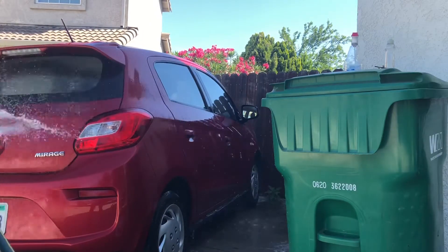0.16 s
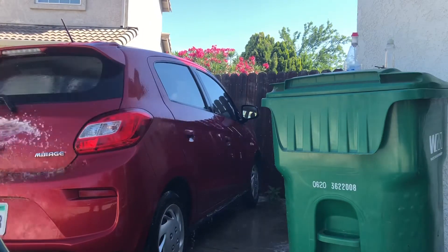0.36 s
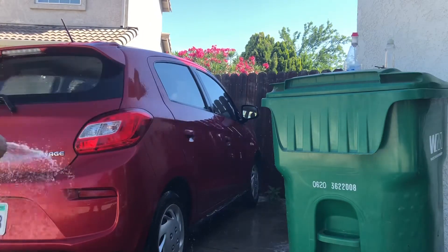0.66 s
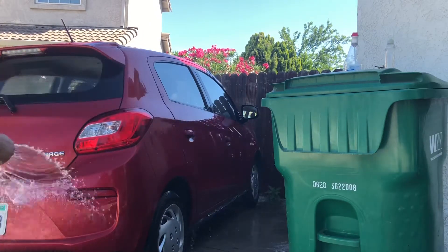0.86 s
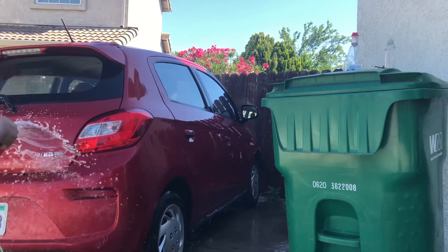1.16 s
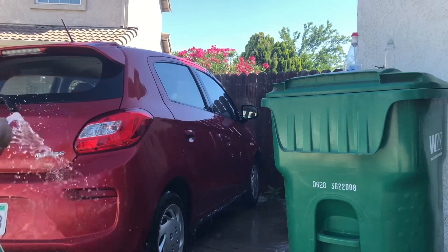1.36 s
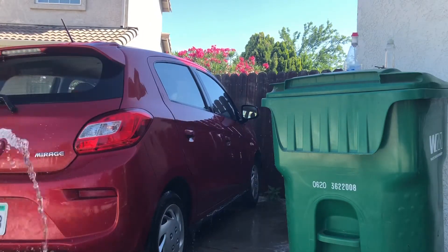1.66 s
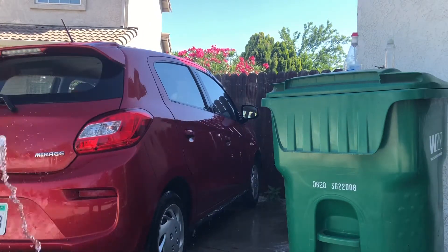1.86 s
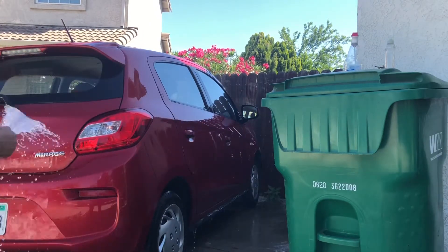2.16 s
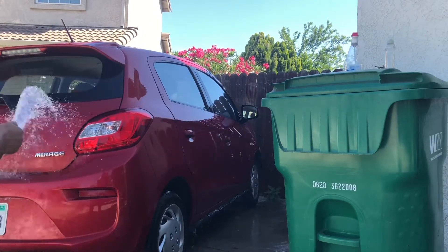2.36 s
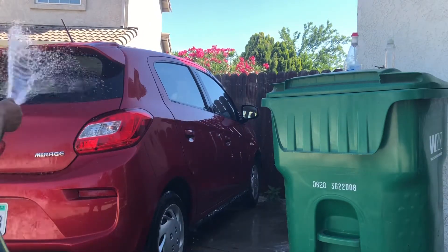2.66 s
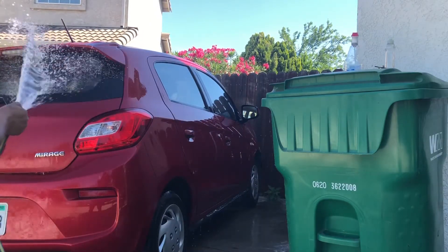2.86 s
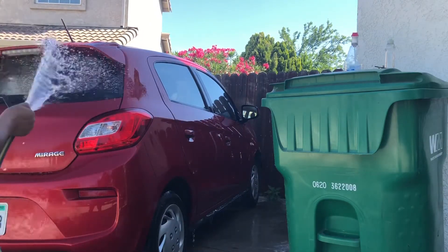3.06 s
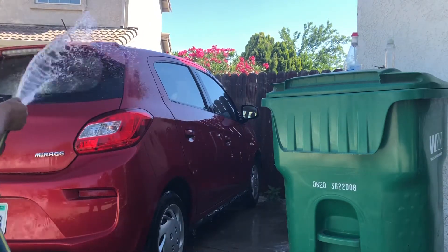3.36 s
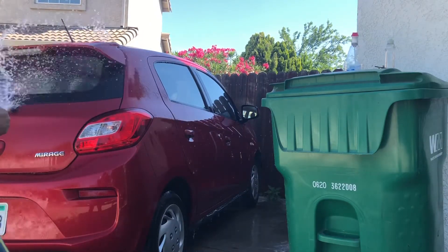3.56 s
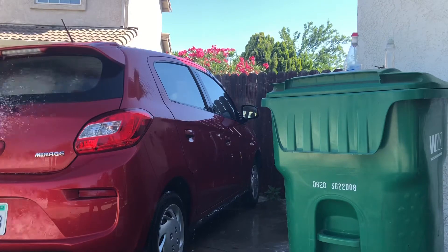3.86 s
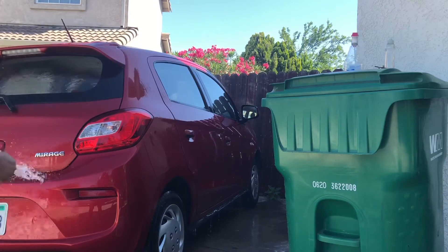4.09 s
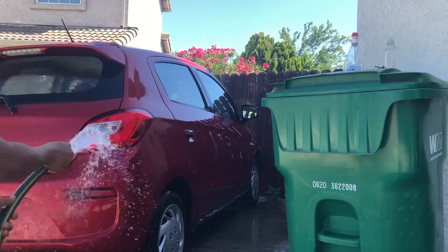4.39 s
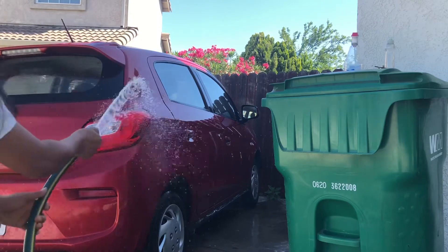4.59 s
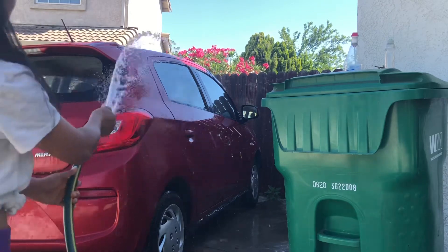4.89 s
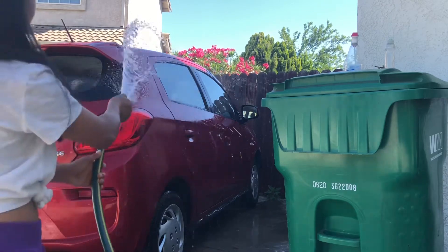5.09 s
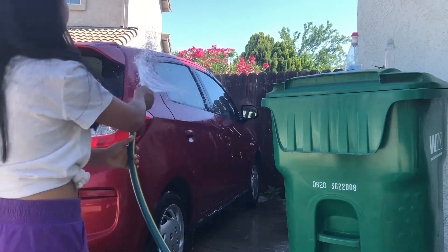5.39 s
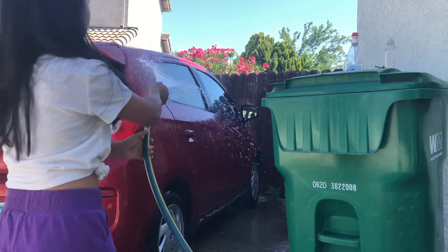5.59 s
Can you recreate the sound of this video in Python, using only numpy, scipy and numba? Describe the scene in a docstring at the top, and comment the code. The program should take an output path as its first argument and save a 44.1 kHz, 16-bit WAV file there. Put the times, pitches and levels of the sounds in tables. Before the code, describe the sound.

A hose with a half-blocked end sprays the back of a parked car, a metre or two from a mono outdoor microphone. From 0 to 1.6 s the jet drums steadily on hollow panels and patters on sheet metal and glass, with bright hiss and sharp wet smacks. From about 1.65 to 2.2 s the drumming drops away, leaving airy spray and splashing gobs. At 2.2 to 2.7 s a strong burst hits with low thumps and dense hiss, then it thins and softens towards 3.6 s. Short raspy, sliding sparrow chirps sound around 3.4, 3.6, 3.8 and 4 s. Between 4.1 and 4.5 s the jet strikes hard again, booming and rattling over several panel tones with coarse splatter. It weakens to scattered droplets by 5.2 s, with faint chirps near 5.2 and 5.4 s and a small coarse splash around 5.5 s. Low distant traffic continues throughout.

```python
"""Hose spray on a parked car

A hose, half closed by a thumb, sprays the back of a car in a driveway, a metre or two from the microphone.
The jet drums on hollow panels (noise through low resonances) and rings sheet and glass (drops through
higher ones); spray hisses as thousands of tiny resonant droplets over smooth mist, and heavy gobs smack
with a broad crack and a plop. Behind, traffic rumbles as coloured noise and a sparrow's sliding tones chirp."""
import sys
import numpy as np
from scipy import signal
from scipy.fft import rfft, irfft
from scipy.io import wavfile
from scipy.ndimage import uniform_filter1d
from numba import njit

SR = 44100
rng = np.random.default_rng(int(sys.argv[2]) if len(sys.argv) > 2 else 0)


def transcribe(u):
    """Save the signal u as a 16-bit wav file named by the first command-line argument.

    u: samples, shape (n,) or (channels, n), limited to [-1, 1]; the rate is SR.
    q: integer samples, one column per channel.
    """
    v = np.clip(np.atleast_2d(u).T, -1, 1)
    q = np.round(v * 32767).astype(np.int16)
    wavfile.write(sys.argv[1], SR, q)


def gain_from_db(level_db):
    """Turn a decibel level (scalar or array-like) into a linear amplitude factor."""
    decades = np.asarray(level_db, float) / 20
    return 10 ** decades


N = 252825
TIME = np.arange(N) / SR  # seconds

# spectrum of distant traffic and air: pitch_hz, relative density_db (per Hz)
TOWN_SPECTRUM = [(18, -37), (30, -6), (59, 5), (92, 8.5), (437, -13), (721, -18), (1140, -17.5),
                 (1930, -22.5), (2720, -18.5), (3000, -28), (3900, -20), (6600, -120)]
TOWN_DB = -51.5

# notes of the sparrow's phrase: start_s (into the phrase), length_s, start_hz, end_hz, level_db,
# octave_db (overtone against the note)
SPARROW_NOTES = [(0., 0.029, 4900, 5280, -51, -30), (0.022, 0.034, 3630, 4430, -51, -32),
                 (0.045, .022, 3400, 3150, -57, -8), (.062, 0.08, 2990, 2430, -63.5, 6)]
# phrases sung: start_s, gain_db (added to the notes), notes_sung (count)
SPARROW_PHRASES = [(3.379, 0.5, 4), (3.615, 1, 4), (3.952, 0, 4), (5.39, -2.5, 2)]
# single sparrow notes: start_s, length_s, start_hz, end_hz, level_db
SPARROW_CHIRPS = [(3.818, 0.015, 3110, 2960, -44), (5.232, .12, 4300, 2960, -63)]
RASP_TOP_HZ, CLEAR_TONE = 250, 1.5  # roughness band top; steady tone against rasp of rms 1
PITCH_WOBBLE = .006  # fraction of the pitch
SECOND_VOICE_RATIO, SECOND_VOICE_DB = 1.09, -11
HOUSES_T60_S, HOUSES_DB = .25, -3.5

# heavy drops pattering on the sheet: start_s, level_db, upper_db (upper resonances, added to their levels)
PATTER = [(0.0, -46.5, -4), (0.3, -42.5, -9), (0.38, -52.5, 5), (0.56, -49, 4.5), (0.78, -41, 0),
          (0.96, -44.5, 3), (1.21, -43, -1), (1.45, -47.5, 1), (1.48, -37, -13), (1.5, -53, 3),
          (1.55, -44, -5), (1.64, -74, -2), (1.74, -70, 16), (2.03, -75, 3), (2.06, -69, 16),
          (2.09, -87, 4), (2.2, -83, -6), (2.22, -49, 12), (2.23, -46, -9), (2.26, -48.5, 5),
          (2.36, -35, -11), (2.38, -43, -4), (2.46, -39, -11), (2.55, -47, -13), (2.65, -47.5, 1),
          (2.7, -52, -13), (2.89, -57, -6), (2.98, -51, -8), (3.09, -50.5, 0), (3.5, -57.5, -7),
          (3.73, -54, -14), (3.77, -44.5, -4), (3.93, -52, -5), (4.31, -40, 0.5), (4.34, -42.5, 5.5),
          (4.45, -39, -4), (4.47, -47, 9), (4.5, -43, -6), (4.53, -53, -4), (4.64, -57, 10.5),
          (4.79, -60.5, 1.5), (4.88, -63.5, 8), (4.93, -48, 0), (5.04, -63, 2), (5.38, -58.5, -3),
          (5.44, -48, 1), (5.59, -54.5, 6.5), (5.73, -49, -2)]
# crowded ringing of sheet and glass: pitch_hz, width_hz, level_db (relative)
SHEET_MODES = [(629, 120, -2.5), (743, 146, 1), (830, 104, -3), (958, 150, -2), (1125, 160, -2),
               (1300, 310, -2.5), (1620, 560, -1), (1950, 680, -9.5)]
SHEET_SPLIT_HZ, SHEET_WANDER_DB = 1100, 2.6
PATTER_SPREAD_DB, PATTER_WASH_DB = 6, 3.5  # spread of drop sizes; running water against the drops

# jet on the bodywork: start_s, level_db, place (-1 rounded corner, 0 deep middle, 1 stiff edge)
JET = [(0.0, -41, 0.76), (.14, -42.5, 0.75), (.29, -36, 0.53), (.4, -39.5, 0.5), (.77, -35, 0.31),
       (1.0, -37.5, 0.53), (1.48, -37, 0.28), (1.55, -40.5, 0.37), (1.65, -62, 0.58), (2.205, -71, 0.79),
       (2.225, -40, 0.47), (2.36, -37, 0.82), (2.47, -43.5, 0.99), (2.51, -44, 0.78), (2.64, -42, 0.74),
       (2.78, -56, 0.72), (3.11, -45.5, 0.93), (3.48, -59, 0.77), (3.67, -50, 0.75), (3.77, -48.5, 0.83),
       (4.085, -45.5, 0.68), (4.11, -39, -0.036), (4.17, -32.5, 0.54), (4.21, -32, -0.74), (4.25, -36.5, 1),
       (4.275, -35, 0), (4.29, -33, -0.74), (4.325, -36.5, -0.44), (4.345, -42, 0.15), (4.385, -35, 0.34),
       (4.425, -36.5, 0.94), (4.465, -32, 0.37), (4.5, -40.5, 0.22), (4.58, -52, 0.66), (4.67, -46, 0.54),
       (4.82, -58, 0.21), (4.94, -52, 0.88), (5.04, -53.5, 0.3), (5.31, -64.5, 0.99), (5.37, -49, 0.26),
       (5.45, -46, 0.59), (5.73, -45.5, 0.88)]
# hollow panel modes: pitch_hz, width_hz, corner_db, middle_db, edge_db (relative levels)
PANEL_MODES = [(134, 28, -21, -17.5, -8), (159.6, 26.7, -18, 1.5, -7), (189, 38.6, -12, -3, -8),
               (244, 30.6, -16, -7.5, -7), (295.3, 37.4, 6, -6, -3.5), (366.3, 28, -16, -20.5, 1.5),
               (425, 54, 4, -27, 4), (508.6, 28, -8, -21, -5)]
# slugs of water that thump the panel: start_s, level_db (single-sample push against the steady push)
THUMPS = [(2.256, 30), (2.336, 30), (2.38, 33), (2.404, 32), (2.454, 33), (4.107, 30.5), (4.15, 27),
          (4.173, 27.5), (4.291, 30), (4.311, 35), (4.345, 36.5), (4.37, 28)]
PUSH_FLUTTER_DB, MODE_WANDER_DB = 1.3, .6

# big gobs of water landing: start_s, crack_db, pitch_hz (of the plop), sharpness (0-1),
# plop_db (against the crack)
GOBS = [(0.111, -12.5, 6200, 0.5, -29), (.1365, -26, 3840, 0.3, -4.5), (.215, -23, 5700, 0.85, -7),
        (0.2375, -16, 6400, 0.3, -11), (.367, -20, 5500, 0.3, -8.5), (0.411, -43, 3720, 0.4, -9),
        (.487, -28, 5470, 0.3, 0), (.538, -31, 3100, 0.6, 1), (.5413, -7.5, 9100, 0.6, -19),
        (.562, -20.5, 5300, 0.3, -12), (0.587, -37.5, 1160, 0.1, 8.5), (.6105, -15, 11600, 0.8, -6),
        (.627, -25, 6100, .6, -6), (.711, -30, 3290, 0.6, -8), (.7283, -15, 8350, 0.5, -15),
        (.865, -26, 5700, 0.5, 2), (.8936, -21, 9450, 0.6, -0.5), (0.931, -29, 6000, 0.7, 1),
        (0.943, -27, 2970, 0.3, -2), (0.9793, -20.5, 3730, 0.33, -11), (1.2058, -21, 13100, 0.6, -1),
        (1.2471, -29.5, 5400, 0.5, 4), (1.4712, -23.5, 4300, 0.6, -10), (1.478, -29.5, 2920, 0.3, 1),
        (1.5255, -29, 2850, 0.4, -2.5), (1.5329, -19, 12940, .7, -2), (1.5858, -25.5, 6340, .6, 1),
        (1.696, -28, 3750, 0.86, -9), (1.749, -18, 4940, 0.9, -9), (1.8412, -22, 7300, 0.8, -17),
        (1.917, -28.5, 6500, 0.6, 2.5), (1.957, -22, 9500, 0.7, -12), (1.959, -25, 2290, 0.3, -15),
        (2.0378, -4, 8300, 0.65, -18), (2.0558, -31.5, 1550, 0.15, 3.5), (2.0565, -17.5, 2750, 0.26, -3),
        (2.059, -16, 10000, .85, -12), (2.075, -40, 1500, .2, 4), (2.1277, -11.5, 5700, 0.6, -12),
        (2.1809, -23.5, 2700, 0.13, -5), (2.191, -36, 3230, 0.6, 5.5), (2.21, -28, 7160, 0.3, 3),
        (2.214, -21, 9500, .6, -9), (2.215, -32, 1650, 0.12, 7), (2.2383, -30, 2330, 0.5, 6),
        (2.2597, -27, 6000, .7, -2), (2.29, -22, 5970, 0.4, -2), (2.31, -20, 4850, 0.3, -4),
        (2.325, -33, 958, 0.4, -8), (2.3436, -10, 10900, 0.9, -9), (2.384, -22.5, 5530, 0.7, -1.5),
        (2.448, -27, 4930, 0.7, 1.5), (2.4699, -17, 5030, 0.74, -9), (2.4702, -21.5, 2770, 0.17, -0.5),
        (2.4885, -19, 8850, 0.4, -8), (2.588, -20.5, 4100, 0.07, -13), (2.638, -40, 865, 0.56, 2),
        (2.6336, -27.5, 2900, 0.05, -4), (2.6984, -30, 8400, 0.6, 1), (2.7687, -22.5, 7550, 0.45, -18),
        (2.964, -28.5, 5860, 0.3, 3), (3.0662, -27.5, 6540, 0.5, -1), (3.0809, -30.5, 4900, 0.7, 5.5),
        (3.228, -20, 7500, 0.4, -6), (3.345, -39, 2780, 0.44, 2.5), (3.441, -34.5, 5050, 0.5, 4),
        (3.5918, -16, 8700, 0.3, -11), (3.682, -21.5, 5530, 0.5, -17), (3.737, -19.5, 3600, 0.3, -15),
        (3.7538, -26, 2780, 0.47, -0.5), (3.765, -16.5, 5200, 0.85, -17), (3.8169, -21, 5640, 0.5, -2),
        (3.8396, -22, 6570, 0.5, -13), (3.8822, -36, 3460, 0.5, 8), (3.941, -21, 9000, .7, -10),
        (4.07, -36, 5030, .6, -1.5), (4.163, -20.5, 9600, 0.7, -4.5), (4.2138, -24, 6000, .8, -3.5),
        (4.2438, -20, 6240, .8, -5.5), (4.2843, -32.5, 970, 0.7, -5), (4.2848, -16, 6500, 0.4, -20),
        (4.335, -33, 1950, 0.4, 4), (4.3348, -34, 1130, 0.7, 4), (4.392, -18, 6400, 0.5, -5),
        (4.46, -37, 1030, 0.46, 0), (4.4672, -20, 12800, .7, 1), (4.5087, -21, 13400, 0.8, 2),
        (4.6655, -21.5, 4470, 0.05, -2), (4.671, -19, 6740, 0.56, 2), (4.843, -27, 5360, 0.1, -7),
        (4.9252, -17.5, 7260, 0.25, -7), (5.076, -41, 3280, 0.1, -2), (5.227, -40, 6260, 0.5, -7),
        (5.36, -33, 4250, 0.5, -3), (5.387, -30.5, 5000, 0.4, 0.5), (5.5135, -31, 2550, 0.3, 1),
        (5.587, -29, 5130, 0.5, -4), (5.675, -32.5, 4000, 0.3, 3.5), (5.706, -34, 5100, 0.8, -1),
        (0.0044, -27, 5940, 0.65, -6), (0.1531, -26, 6860, 0.65, -5), (0.1825, -25, 7520, 0.65, -5),
        (0.2514, -23, 13900, 0.65, -5), (0.385, -31, 9690, 0.65, -5), (0.4179, -26, 6550, 0.65, -7.5),
        (0.4379, -25.5, 5800, 0.6, -6), (0.4574, -28, 7460, 0.65, -5), (0.6449, -25, 14900, 0.65, -5),
        (0.9134, -17, 15300, 0.8, -1), (1.0104, -26, 15400, 0.65, 1), (1.0414, -29, 4470, 0.65, -3),
        (1.077, -30, 4840, 0.4, -9), (1.0954, -20, 11800, 0.65, -3), (1.0984, -22, 9320, 0.65, -6),
        (1.1274, -31, 5620, 0.3, -2), (1.2684, -25, 7170, 0.65, -4), (1.3433, -21, 6660, 0.4, -9),
        (1.3673, -21.5, 6200, 0.56, -6), (1.3882, -24, 6200, 0.6, -4), (1.4546, -28, 6320, 0.5, -12),
        (1.6801, -28, 6100, 0.65, -10), (1.7074, -22, 7510, 0.65, -8), (1.7789, -24, 7400, 0.7, -7),
        (1.8846, -36, 3320, 0.5, -2), (1.9051, -29, 6330, 0.65, -12), (1.9694, -24, 3970, 0.65, -9),
        (2.0764, -23, 6270, 0.4, -13), (2.3564, -19, 5690, 0.6, -8), (2.4194, -25, 5430, 0.6, -3),
        (2.4804, -22, 9270, 0.65, -10), (2.7796, -23.5, 7650, 0.5, -6.5), (2.9392, -33, 6170, 0.4, -7),
        (2.9764, -30, 5470, 0.65, -3), (2.9936, -28, 11000, 0.65, -5), (3.0155, -26, 7120, 0.65, -6),
        (3.0325, -29, 5530, 0.5, -5), (3.1404, -25, 9300, 0.65, -3), (3.1594, -32, 5950, 0.65, -5),
        (3.1737, -37, 6320, 0.65, -8), (3.2004, -33, 5670, 0.65, -5), (3.2414, -26, 8810, 0.65, -2),
        (3.6994, -25, 5330, 0.6, -9), (3.7953, -21, 5100, 0.6, -8), (3.92, -41, 6910, 0.65, -15),
        (4.2014, -24.5, 2900, 0.3, -7), (4.555, -31, 6440, 0.65, -10), (4.593, -25, 15500, 0.65, -1),
        (4.6104, -37, 3390, 0.4, -3), (4.6314, -27, 15100, 0.65, -5), (4.8978, -28, 7800, 0.5, -3),
        (5.0404, -34, 6810, 0.65, -3), (5.1053, -32, 10700, 0.65, -1), (5.1507, -36, 15000, 0.65, -5),
        (5.2074, -40, 10100, 0.65, -6), (5.2944, -33, 9290, 0.65, -5), (5.4824, -30, 6420, 0.65, -7)]
CRACK_Q, PLOP_T60_S = .4, .013
YARD_T60_S, YARD_DB = .09, -8
SMALL_GOB_COUNT, SMALL_GOB_DB, SMALL_GOB_SPREAD_DB = 260, 10.5, 4.5  # level above the spray
SMALL_GOB_HZ, SMALL_GOB_PITCH_SPREAD = 6400, .2  # middle pitch; spread as a natural-log ratio

# breaking spray: start_s, level_db, fineness_db (mist up, coarse drops down)
SPRAY = [(0.0, -42, -6.5), (.08, -51, 3), (.13, -45.5, -1.5), (.66, -43.5, -0.5), (.73, -42, 2),
         (.83, -44.5, 1), (.88, -39, -2), (1.11, -42.5, 1), (1.31, -45.5, 0), (1.43, -44, -0.5),
         (1.48, -40.5, -4), (1.51, -43.5, 0.5), (1.66, -46.5, 0), (1.72, -38.5, 1.5), (1.76, -41, 0.5),
         (1.88, -46, -5), (1.95, -38.5, -2), (1.975, -37.5, -1), (2.03, -45.5, -3), (2.06, -41.5, 8),
         (2.1, -46, -1), (2.165, -49.5, -6), (2.235, -34, -4), (2.49, -37.5, -1.5), (2.54, -44.5, 5.5),
         (2.63, -39.5, -3), (2.74, -52, 2), (2.92, -54.5, 3), (3.14, -42, -0.5), (3.19, -47, -3.5),
         (3.36, -53.5, -3), (3.56, -54, -1), (3.72, -53.5, 0.5), (3.75, -45.5, 0.5), (4.0, -44.5, -2.5),
         (4.09, -52.5, -4), (4.19, -41, -1), (4.275, -47, 1), (4.29, -45, 5), (4.375, -34.5, -4.5),
         (4.435, -39.5, -0.5), (4.49, -33, -0.5), (4.53, -45.5, -4.5), (4.64, -48, 0), (4.69, -41.5, -3.5),
         (4.76, -53, -2), (4.92, -44, 1.5), (5.04, -49.5, -6), (5.2, -61, 8.5), (5.34, -55.5, -3.5),
         (5.42, -43.5, -5.5), (5.59, -39.5, -8), (5.63, -46, -10), (5.73, -49, -6)]
# drop sizes: low_hz, high_hz, level_db, tilt (dB per dB of fineness), mist_db, size_spread_db, ring_out_s
DROP_SIZES = [(2420, 4470, -7, -0.32, -7, 7.5, 0.026), (4840, 9500, -2.5, 0.64, -3, 15.5, 0.017),
              (10300, 18300, -0.15, 0.8, 2, 5, 0.0071)]


def unit(x):
    """Scales a sound to an rms of 1."""
    return x / np.sqrt(np.mean(x ** 2))


def band(x, hz, width):
    """Two-pole resonance, gain 1 at the centre."""
    return signal.lfilter(*signal.iirpeak(hz, hz / width, SR), x)


def between(x, lo_hz, hi_hz):
    """Keeps one stretch of the spectrum, at an rms of 1."""
    edges_hz = [lo_hz, min(hi_hz, .45 * SR)]
    return unit(signal.sosfilt(signal.butter(3, edges_hz, "band", fs=SR, output="sos"), x))


def columns(table):
    """Draws each column after the first as a line over time."""
    s, *rest = np.transpose(table)
    return [np.interp(TIME, s, c) for c in rest]


def walk(rate):
    """Random levels held 1 / rate s and slewed twice; spread near 1."""
    hold = int(SR / rate)
    steps = np.repeat(rng.standard_normal(N // hold + 1), hold)
    return 0.69 * uniform_filter1d(uniform_filter1d(steps, hold), hold)[:N]


def smear(x, t60):
    """Many scattered reflections dying away."""
    tail = rng.standard_normal(SR // 3) * np.exp(-np.log(1000) * TIME[:SR // 3] / t60)
    return signal.fftconvolve(x, tail / np.sqrt(np.sum(tail ** 2)))[:N]


@njit
def splats(start, peak, hz, q, t60, sharp, glide, noise):
    """Each drop: a tick, then dying noise, twice through a resonance that rises as the trapped air shrinks."""
    out = np.zeros(len(noise))
    for e in range(len(start)):
        first, f, k = int(start[e]), hz[e], 1 / q[e]
        b, l, b2, l2 = 0., 0., 0., 0.  # memories of the two resonances
        env, rise = 1., 1.
        fall = np.exp(-np.log(1000) / (t60[e] * SR))
        for i in range(first, min(first + int(t60[e] * SR), len(out))):
            g = np.tan(np.pi * min(f / SR, .4))
            x = (1 - sharp[e]) * env * (1 - rise) * noise[i - e % 997]
            if i == first:
                x = 6 * sharp[e] / np.sqrt(g * k)  # the tick
            v = (b + g * (x - l)) / (1 + g * (g + k))
            b, l = 2 * v - b, l + 2 * g * v
            w = (b2 + g * (k * v - l2)) / (1 + g * (g + k))
            b2, l2 = 2 * w - b2, l2 + 2 * g * w
            out[i] += peak[e] * np.sqrt(k / g) * w
            env, rise = env * fall, rise * .9
            f = f * (1 + glide[e] / SR)  # glide: fraction per second
    return out


def droplets(count, lo_hz, hi_hz, spread_db, t60, q):
    """Drops at random moments; a few are far bigger than the rest."""
    moment, pitch, bulk, tone, ring = rng.random((count, 5)).T
    hz = lo_hz * (hi_hz / lo_hz) ** pitch
    size = gain_from_db(np.minimum(-spread_db * np.log(1 - bulk), 16))
    return unit(splats(moment * N, size, hz, q * (.5 + tone), t60 * (.5 + ring), 0.32 * tone, 30 * ring,
                       rng.standard_normal(N)))


def town():
    """Distant traffic and air: steady coloured noise that swells a little."""
    hz, db = np.transpose(TOWN_SPECTRUM)
    f = np.maximum(np.arange(N // 2 + 1) * SR / N, 1)
    colour = gain_from_db(np.interp(np.log(f), np.log(hz), db))
    noise = irfft(rfft(rng.standard_normal(N)) * colour, N)
    return gain_from_db(TOWN_DB + walk(3)) * unit(noise)


def sparrow():
    """Short raspy, unsteady two-voiced whistles that slide in pitch; the houses smear them into a tail."""
    notes = []
    for phrase_s, gain_db, sung in SPARROW_PHRASES:
        for s, length, from_hz, to_hz, db, octave_db in SPARROW_NOTES[:int(round(sung))]:
            notes.append((phrase_s + s, length, from_hz, to_hz, db + gain_db, octave_db))
    notes += [(*chirp, -30) for chirp in SPARROW_CHIRPS]
    out = np.zeros(N)
    rasp = CLEAR_TONE + between(rng.standard_normal(N), 20, RASP_TOP_HZ)
    wobble = 1 + PITCH_WOBBLE * walk(300)
    for s, length, from_hz, to_hz, db, octave_db in notes:
        along = np.arange(int(length * SR)) / (length * SR)
        now = slice(int(s * SR), int(s * SR) + len(along))
        hz = (from_hz + (to_hz - from_hz) * along) * wobble[now]
        phase = 2 * np.pi * np.cumsum(hz) / SR
        voice = np.sin(phase) + gain_from_db(octave_db) * np.sin(2 * phase)
        voice = voice + gain_from_db(SECOND_VOICE_DB) * np.sin(SECOND_VOICE_RATIO * phase)
        out[now] += gain_from_db(db) * rasp[now] * np.sin(np.pi * along) ** .5 * voice
    return out + gain_from_db(HOUSES_DB) * smear(out, HOUSES_T60_S)


def sheet():
    """Heavy drops and running water ring the thin sheet; each resonance comes and goes as the jet wanders."""
    level_db, upper_db = columns(PATTER)
    drops = droplets(count=2500, lo_hz=630, hi_hz=1980, spread_db=PATTER_SPREAD_DB, t60=0.026, q=0.94)
    push = drops + gain_from_db(PATTER_WASH_DB) * between(rng.standard_normal(N), 450, 2450)
    ring = 0
    for hz, width, db in SHEET_MODES:
        mode_db = db + SHEET_WANDER_DB * walk(22.04) + upper_db * (hz > SHEET_SPLIT_HZ)
        ring = ring + gain_from_db(mode_db) * unit(band(push, hz, width))
    return gain_from_db(level_db) * between(ring, 430, 2190)


def panels():
    """The ragged jet pushes the hollow panels; where it lands decides which modes answer."""
    level_db, place = columns(JET)
    push = gain_from_db(PUSH_FLUTTER_DB * walk(50)) * rng.standard_normal(N)
    push[[int(s * SR) for s, db in THUMPS]] += gain_from_db(np.array([db for s, db in THUMPS]))
    drum, energy = 0, 0
    for hz, width, *place_db in PANEL_MODES:
        gain = gain_from_db(np.interp(place, [-1, 0, 1], place_db))
        wander = gain_from_db(MODE_WANDER_DB * walk(18))
        drum = drum + gain * wander * unit(band(band(push, hz, width), hz, 2 * width))
        energy = energy + gain ** 2
    # the jet's energy is shared out among the modes
    return gain_from_db(level_db) * drum / np.sqrt(energy)


def small_gobs():
    """Lesser gobs at random moments, louder where the spray is heavy; columns as in GOBS."""
    moment, edge = rng.random((SMALL_GOB_COUNT, 2)).T
    loud, pitch, plop = np.clip(rng.standard_normal((SMALL_GOB_COUNT, 3)).T, -1.5, 1.5)
    spray_db = columns(SPRAY)[0][(moment * N).astype(int)]
    crack_db = spray_db + SMALL_GOB_DB + SMALL_GOB_SPREAD_DB * loud
    hz = SMALL_GOB_HZ * np.exp(SMALL_GOB_PITCH_SPREAD * pitch)
    return np.array([moment * N / SR, crack_db, hz, 0.5 + 0.053 * edge, -4.5 + 1.2 * plop])


def smacks():
    """A gob lands as a broad, sharp crack plus a narrower plop at its own pitch; ground and walls throw it back."""
    s, db, hz, sharp, plop_db = np.hstack([np.transpose(GOBS), small_gobs()])
    one = np.ones(len(s))
    t60 = PLOP_T60_S * one
    # the crack sits above the plop and keeps its pitch; the plop is duller and rises
    crack = splats(s * SR, gain_from_db(db), 1.46 * hz, CRACK_Q * one, 1.06 * t60, sharp, 0 * one,
                   rng.standard_normal(N))
    plop = splats(s * SR, gain_from_db(db + plop_db), hz, 2.74 * one, t60, .5 * sharp, 15 * one,
                  rng.standard_normal(N))
    return crack + plop + gain_from_db(YARD_DB) * smear(crack + plop, YARD_T60_S)


def spray():
    """Coarse, fine and finest drops arrive in quick shared sheets, over the smooth hiss of the mist."""
    level_db, fine_db = columns(SPRAY)
    sheets_db = 2.0 * walk(6.25) + 1.9 * walk(45) + 1.3 * walk(130)
    out = 0
    for lo, hi, db, tilt, mist_db, spread_db, t60 in DROP_SIZES:
        drops = droplets(count=3500, lo_hz=lo, hi_hz=hi, spread_db=spread_db, t60=t60, q=1.25)
        mist = gain_from_db(mist_db) * between(rng.standard_normal(N), lo, hi)
        hiss = unit(between(drops, 0.63 * lo, 1.75 * hi) + mist)
        out = out + gain_from_db(db + tilt * fine_db) * hiss
    return gain_from_db(level_db + sheets_db) * out


def scene():
    """Spray and gobs in front, the car's panels and sheet, then sparrow and town behind; one channel."""
    return (spray() + smacks() + panels() + sheet() + sparrow() + town())[None]


def top_cut(x):
    """Nothing passes above the cut-off."""
    return signal.sosfilt(signal.butter(12, 15850, fs=SR, output="sos"), x)


def record(dry):
    """The microphone slightly favours the lower treble and drops the deepest bass and the top."""
    lifted = dry + gain_from_db(-18.0) * band(dry, 6430, 1900)
    no_rumble = signal.sosfilt(signal.butter(4, 39, "high", fs=SR, output="sos"), lifted)
    mix = signal.sosfilt(signal.ellip(8, .2, 60, 15800, fs=SR, output="sos"), no_rumble)
    return top_cut(mix)


dry = scene()
out = record(dry)
transcribe(out)
```